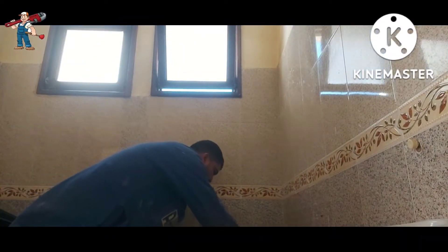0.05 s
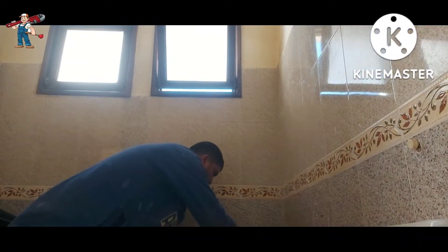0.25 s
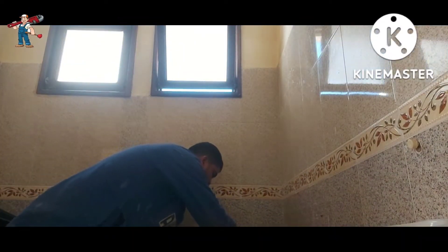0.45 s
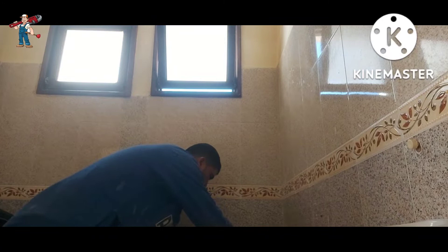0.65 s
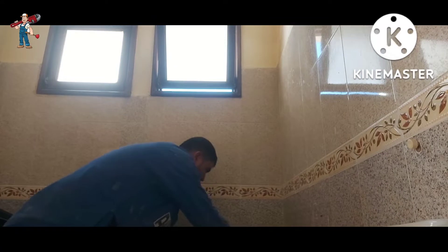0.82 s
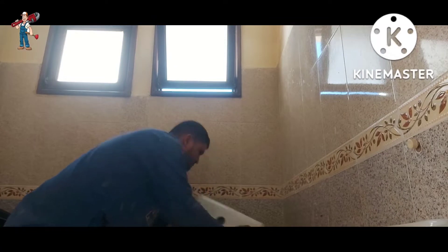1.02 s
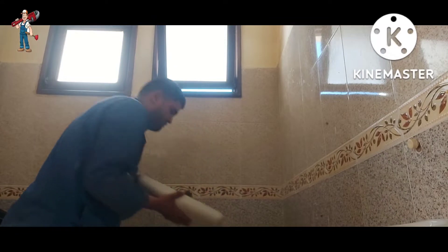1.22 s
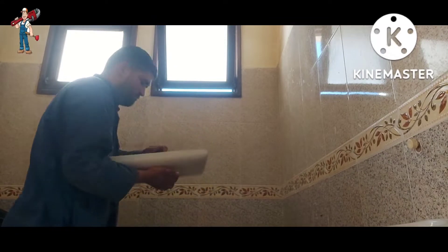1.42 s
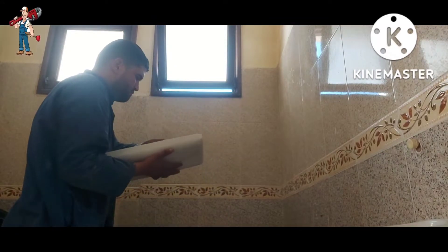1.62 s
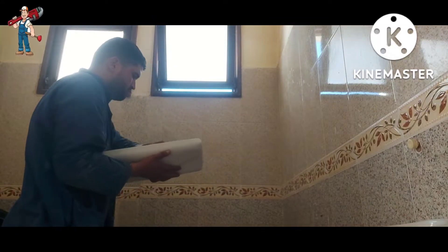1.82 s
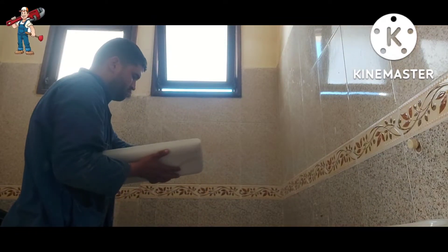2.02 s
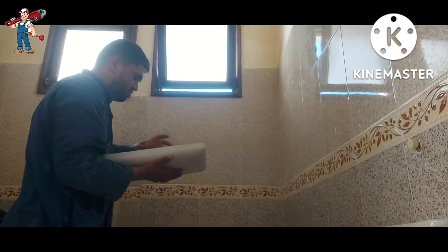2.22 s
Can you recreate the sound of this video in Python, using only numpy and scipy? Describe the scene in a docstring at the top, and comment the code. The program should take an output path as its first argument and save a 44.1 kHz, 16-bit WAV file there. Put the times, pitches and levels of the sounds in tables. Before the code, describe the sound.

Ceramic clinks ring out in a quick, uneven run as a toilet tank lid is shifted and lifted off nearby. After a brief scrape, hands rub and scuff the lid, with a short echo from tiled bathroom walls.

```python
"""A heavy ceramic lid knocks on its toilet tank as it is shifted and lifted off in a small tiled bathroom.
Each knock sets both lid and tank ringing and echoes off the tiles. The rim scrapes free,
then friction makes soft gritty scuffs as the lid is carried and turned in the hands.
A low room noise lies under it all."""
import sys
import numpy as np
from scipy import signal
from scipy.fft import rfft, irfft, next_fast_len
from scipy.io import wavfile

SR = 44100
rng = np.random.default_rng(int(sys.argv[2]) if len(sys.argv) > 2 else 0)


def persist_wave(psi):
    """Save psi, clipped to +-1, as 16-bit WAV."""
    counts = np.round(np.clip(psi, -1, 1) * 32767).astype(np.int16)
    wavfile.write(sys.argv[1], SR, np.atleast_2d(counts).T)


N = 103635
TIME = np.arange(N) / SR

# The lid hits the tank: t/s, tank/dB, lid/dB, treble/dB, clack/dB, crack/dB, dull above/Hz
KNOCKS = [(.2445, -7, -1, 0.5, -1, -6, 3800), (.269, -21.5, -2.5, -13, -11.5, -15, 3390),
          (.357, 1.5, -10, -3, -1.5, 0, 12000), (.451, -6.5, -10, -16.5, 0.5, -16, 5220),
          (.618, -15.5, -24.5, -16.5, -11.5, -25, 4020), (.633, 1, -10.5, -25, -4, -16, 7130),
          (.712, -14, -19, -19.5, -19, -33, 7000), (.754, -9, -22, -27.5, -19.5, -41.5, 5000),
          (.792, -14.5, -21, -26.5, -24, -43.5, 4008), (.883, -6.5, -1, -11.5, -4.5, -5, 4390),
          (.950, -9, -15.5, -13.5, -20, -18, 9000)]
# The tones of each part: f/Hz, level/dB, time to fade by 60 dB (t60)/s, left over right/dB
TANK_TONES = [(234.74, -42.5, 0.74, 1.5), (338.84, -31.5, .5, -5.5), (355.1, -30, .62, -1),
              (382.6, -28, .58, -4.5), (427.4, -34, 0.522, -6), (694, -35.5, 0.382, 15),
              (1030.9, -39.5, 0.274, -0.5), (1217.2, -40.5, 0.482, -3), (1381.6, -46, 0.28, 11),
              (2123.4, -30, 0.2, -0.5), (3725, -33.5, 0.21, 2.5), (3785, -31, 0.311, 2),
              (4024, -42.5, .29, -1), (4454, -29.5, 0.2675, -2), (6334, -36, 0.339, -9.5),
              (7049, -31.5, 0.317, -4), (7133, -40, .3, -4), (9270, -39.5, .2, -11),
              (11910, -43.5, .2, 2.5)]
LID_TONES = [(212.37, -42.5, 0.487, 0.5), (468.6, -27.5, 0.739, 2), (506.9, -19.5, .28, -6.5),
             (533.7, -17, 0.3373, -8.5), (611.3, -26, 0.29, -8.5), (646.3, -26, 0.29, -11),
             (1082.1, -36.5, .5, 0), (1164.3, -42, 0.39, 0), (1523, -44, 0.29, 13), (1608, -43, 0.28, 2.5),
             (1983, -34, 0.36, 19), (2060, -19, 0.27, -0.5), (3241, -41, 0.37, -13.5),
             (3690, -28.5, 0.242, 21.5), (4580, -40.5, 0.17, -0.5), (5560, -52, 0.35, 16),
             (7500, -41.5, 0.33, 5)]
def ceramic_ring():
    """Every knock rings both tank and lid, in a mix set by where they meet."""
    start, tank_db, lid_db, treble_db, _, _, dull_hz = np.transpose(KNOCKS)
    tank = struck(TANK_TONES, list(zip(start, tank_db, treble_db, dull_hz)))
    lid = struck(LID_TONES, list(zip(start, lid_db, treble_db, dull_hz)))
    return tank + lid


def struck(tones, blows, swell_t60=.02146, drop_t60=.0489, waver=.299):
    """Blows ring one piece of ceramic: each tone swells, drops quickly, then rings on and wavers."""
    start, blow_db, treble_db, dull_hz = np.transpose(blows)
    out, extra = np.zeros((2, N)), from_db(5.5)
    for hz, db, t60, side_db in tones:
        treble = np.clip(np.log2(hz / 1100), 0, 1) * treble_db
        clicks = np.zeros(N)
        clicks[(start * SR).astype(int)] = from_db(db + blow_db + treble) * soften(hz, dull_hz)
        tone = ring(clicks, hz, t60) + extra * ring(clicks, hz, drop_t60)
        tone -= (1 + extra) * ring(clicks, hz, swell_t60)  # makes it swell from silence
        tone *= 1 + waver * wander(25 * np.sqrt(hz / 1000))
        out += pan(side_db) * tone
    return delay_left(*out, lag_s=.00003)


# The rim touches, then drags free: t/s, level/dB, treble/dB, dull above/Hz
RIM_TOUCHES = [(.451, -6.5, -8, 5000), (.633, -8.5, -11, 6000), (.881, 0, -1, 6970)]
SCRAPE = (.953, -1, -1, 12000)
# The tones this wakes: f/Hz, level/dB, t60/s, left over right/dB
RIM_TONES = [(1035, -36.5, .25, 0.5), (1093.5, -34.5, 0.306, 0.5), (1525.4, -36.5, 0.227, 11),
             (1671, -41.5, 0.34, 0), (2628, -44, 0.296, 0), (3121, -40, 0.208, -0.5),
             (4542, -41.5, .24, -1), (4597, -46.5, 0.204, -1)]
SCRAPE_TONES = [(4030, -55, .21, -1), (5498, -48.5, 0.344, 0), (6455, -47.5, 0.262, -5.5)]
def rim_ring():
    """Touches along the rim ring its harsher tones; the last scrape leaves a thin high ring."""
    return struck(RIM_TONES, RIM_TOUCHES) + struck(SCRAPE_TONES, [SCRAPE])


# Tone colour of the echo: f/Hz, level/dB
ECHO_COLOUR = [(41, -94.5), (151, -75), (261, -64), (371, -43), (561, -40), (801, -50.5), (1101, -44),
               (2001, -44), (2551, -49), (4151, -41.5), (5601, -58.5), (7501, -49), (11001, -60),
               (15001, -77.5)]
# Edges of a knock's tank, lid, clack and crack ranges, low to high: f/Hz
RANGE_EDGES = [382, 488, 653, 970, 1360, 2040]
def tile_echo(rise_s=.00535, crack_t60=.0796, tail_t60=.5815):
    """Each knock gives a short crack of noise and a dense echo between the tiled walls."""
    start, tank, lid, _, clack, crack, dull_hz = np.transpose(KNOCKS)
    age = np.maximum(TIME - start[:, None], 0)
    fade = decay(age, tail_t60) + from_db(10) * decay(age, crack_t60)
    power = ((1 - np.exp(-age / rise_s)) * fade) ** 2
    knock_colours = np.transpose([tank, lid, lid, clack, clack, crack])
    out = 0
    for hz, band in noise_bands():
        knock_db = [np.interp(np.log(hz), np.log(RANGE_EDGES), colour) for colour in knock_colours]
        strength = from_db(knock_db) * soften(hz, dull_hz)
        out += from_db(at_hz(ECHO_COLOUR, hz)) * np.sqrt(strength ** 2 @ power) * band
    return out


def thud(start=.73, db=-50, hz=32.5, t60=.02):
    """A faint deep push as the lid's weight lands."""
    age = np.maximum(TIME - start, 0)
    return from_db(db) * np.sin(2 * np.pi * hz * age) * decay(age, t60)


# Short rubs on the lid: t/s, level/dB, swell/s, hold/s, brightness/(dB per octave), hollow tone/Hz
SCUFFS = [(0.153, -26, 0.0074, 0.064, -1, 1920), (0.21, -22.5, 0.0054, 0.01, 0, 1988),
          (0.899, -13.5, 0.0224, 0.0187, 1.5, 3200), (0.953, -11.5, 0.0024, 0.0149, 6.5, 6460),
          (1.163, -24, 0.0306, 0.034, 0.5, 1885), (1.232, -22, 0.0132, 0.0114, 4, 1978),
          (1.415, -19, 0.0774, 0.0194, 1, 1893), (1.507, -8, 0.0043, 0.0051, -3.5, 1870),
          (1.55, -13.5, 0.0063, 0.0281, -1.5, 1962), (1.675, -10.5, 0.00414, 0.0199, -3, 1713),
          (1.745, -7, 0.0107, 0.0225, -0.5, 1680), (1.771, 3, 0.0041, 0.025, 0, 1795),
          (1.856, -26, 0.0097, 0.019, -4.5, 1710), (1.929, -11, 0.00127, 0.01, -5.5, 1610),
          (1.997, -1, 0.00213, 0.017, 2.5, 4157), (2.019, -9, 0.0027, 0.015, 2.5, 1956),
          (2.114, -6.5, 0.00147, 0.0068, 3, 2883), (2.225, -5.5, 0.00847, 0.0114, -3, 1553)]
def scuffs():
    """Friction makes hiss, grit, a faint ring and a hollow note; hiss and note linger in the room."""
    *_, brightness, hollow_hz = np.transpose(SCUFFS)
    power = scuff_power(t60=.194) + from_db(-8) ** 2 * scuff_power(t60=.503)  # scuff + room tail
    hiss = scuff_hiss(power, brightness)
    return hiss + scuff_grit(brightness) + scuff_ring(brightness) + scuff_slips(power, hollow_hz)


def scuff_power(t60):
    """Power over time, one row a scuff: it swells, holds and dies away."""
    out, age = np.zeros((len(SCUFFS), N)), TIME[:SR // 2]
    for row, (start, db, swell, hold, _, _) in zip(out, SCUFFS):
        level = from_db(db) * np.minimum(age / swell, 1) * decay(age - swell - hold, t60)
        part = row[int(start * SR):][:len(level)]
        part += level[:len(part)] ** 2
    return out


# Tone colour of the friction: f/Hz, level/dB
SCUFF_COLOUR = [(50, -91.5), (200, -75), (510, -65.5), (860, -61.5), (1260, -49), (1660, -45.5),
                (2010, -45), (2520, -52.5), (3000, -42.5), (3850, -46), (5450, -55.5), (8450, -51.5),
                (11050, -59), (14950, -73)]
def scuff_hiss(power, brightness, pivot_hz=2414):
    """Rubbing hisses, brighter in some scuffs and duller in others."""
    out = 0
    for hz, band in noise_bands():
        tilt = from_db(brightness * max(np.log2(hz / pivot_hz), -1))
        out += from_db(at_hz(SCUFF_COLOUR, hz)) * np.sqrt(tilt ** 2 @ power) * band
    return out


def scuff_grit(brightness, grains_per_s=1400):
    """Tiny grains click while the contact lasts, louder in bright scuffs."""
    grains = (rng.random(N) < grains_per_s / SR) * rng.choice([-1, 1], N) * uneven(-2)
    passband = signal.butter(1, [1500, 7000], "band", fs=SR, output="sos")
    grit = rms_one(signal.sosfilt(passband, grains + 1e-18))
    grit *= from_db(at_hz(SCUFF_COLOUR, 4400) - 6)
    grit *= np.sqrt(from_db(brightness) ** 2 @ scuff_power(t60=.03))
    return delay_left(grit, grit, LEFT_LAG_S)


# Tones stirred by rubbing: f/Hz, level/dB
SCUFF_TONES = [(1532, -42), (1682, -46.5), (1884, -44.5), (3222, -51), (3689, -53)]
def scuff_ring(brightness, width_hz=19.3):
    """Rubbing stirs a few ringing tones, louder in dull scuffs."""
    level = np.sqrt(from_db(-brightness) @ scuff_power(t60=.246))
    out = 0
    for hz, db in SCUFF_TONES:
        out += from_db(db) * level * np.array([ringing_noise(hz, width_hz) for _ in range(2)])
    return out


def scuff_slips(power, hollow_hz, slips_per_s=700, t60=.0062, db=-37.5):
    """Each scuff is a run of uneven little slips that ring one hollow note of its own."""
    out = np.zeros((2, N))
    for hz, scuff in zip(hollow_hz, power):
        slips = (rng.random(N) < slips_per_s / SR) * uneven(4) * rng.choice([-1, 1], (2, N))
        jolts = np.diff(slips, prepend=0)
        out += np.sqrt(scuff) * rms_one(ring(ring(jolts, hz, t60), hz, t60))
    return from_db(db) * out


# Loudness of the sliding lid: t/s, level/dB
SLIDE_LEVEL = [(0, -55.5), (.09, -52), (.135, -61.5), (.166, -47), (.2, -56), (.25, -57)]
def lid_slide(hz=591.5, width_hz=36):
    """The lid hums faintly as it slides on its seat, leading into the first knock."""
    times, db = np.transpose(SLIDE_LEVEL)
    level = from_db(np.interp(TIME, times, db)) * decay(TIME - times[-1], t60=.1)
    return level * ringing_noise(hz, width_hz) * pan(at_hz(BALANCE, hz))


# The room's steady noise and its bass tones: f/Hz, level/dB
ROOM_COLOUR = [(25, -106), (43, -95.5), (59, -85.5), (91, -93), (123, -80), (146, -80), (176, -74),
               (241, -71), (352, -69.5), (602, -69.5), (902, -73.5), (1802, -71), (2602, -76), (4002, -79),
               (6200, -85.5), (10001, -81), (15001, -88.5)]
ROOM_TONES = [(57, -80), (121, -68.5), (169, -66), (348, -68)]
# How the low part swells: t/s, level/dB
ROOM_SWELL = [(0, 1.5), (.2, 5.5), (.8, 5), (1.15, 1.5), (1.35, -4), (1.5, -3), (1.6, 1), (2.0, 5),
              (2.15, 4.5), (2.35, 1)]
def room_noise(width_hz=7.22):
    """Low noise and bass tones of the room, rising and falling as someone moves about."""
    swell_db = np.interp(TIME, *np.transpose(ROOM_SWELL))
    out = 0
    for hz, band in noise_bands():
        out += from_db(at_hz(ROOM_COLOUR, hz) + swell_db / (1 + (hz / 2000) ** 2)) * band
    for hz, db in ROOM_TONES:
        out += from_db(db + swell_db) * ringing_noise(hz, width_hz) * pan(at_hz(BALANCE, hz))
    return out


# How alike left and right sound: f/Hz, likeness (0 to 1)
LIKENESS = [(100, 0.91), (500, 0.984), (1400, 0.338), (3000, 0.405), (8000, 0.11), (15000, 0.17)]
# Which side is louder: f/Hz, left over right/dB
BALANCE = [(100, 0.5), (220, -3), (380, -4.5), (600, -6), (1100, 0), (2400, -0.5), (4400, -1.5),
           (8200, -9.5), (13000, 8.5)]
LEFT_LAG_S = .0001726
def noise_bands():
    """Stereo noise in slices a third of an octave apart: yields (Hz, band)."""
    freqs = np.maximum(np.arange(N // 2 + 1) * SR / N, 1)
    shared, opposed = rfft(rng.standard_normal((2, N)))
    alike = np.clip(at_hz(LIKENESS, freqs), 0, .99)
    both = np.sqrt(1 + alike) * shared + np.sqrt(1 - alike) * opposed * [[1], [-1]]
    both[0] *= np.exp(-2j * np.pi * freqs * LEFT_LAG_S)  # the left arrives later
    size = next_fast_len(N)
    spectrum = rfft(irfft(both, N), size)
    octave = np.log2(np.maximum(np.arange(size // 2 + 1) * SR / size, 1))
    for hz in 1000 * 2 ** (np.arange(-16, 13) / 3):
        mask = np.sqrt(np.maximum(1 - 3 * np.abs(octave - np.log2(hz)), 0))
        yield hz, rms_one(irfft(spectrum * mask, size)[:, :N]) * pan(at_hz(BALANCE, hz))


def ring(drive, hz, t60):
    """Each click in the drive starts a fading sine wave of the same height."""
    keep, step = decay(1 / SR, t60), 2 * np.pi * hz / SR
    return signal.lfilter([0, np.sin(step)], [1, -2 * keep * np.cos(step), keep * keep], drive + 1e-18)


def ringing_noise(hz, width_hz):
    """Noise rung twice at one pitch becomes an unsteady tone."""
    t60, run_in = np.log(1000) / (2 * np.pi * width_hz), SR // 10
    noise = rng.standard_normal(N + run_in)
    return rms_one(ring(ring(noise, hz, t60), hz, t60)[-N:])


def wander(width_hz):
    """A slow random wobble."""
    freqs = np.fft.rfftfreq(4096, 32 / SR)
    slow = irfft(rfft(rng.standard_normal(4096)) / (1 + (freqs / width_hz) ** 2))
    return rms_one(np.interp(np.arange(N) / 32, np.arange(len(slow)), slow))


def uneven(step_db):
    """Random click sizes, up to three steps away from full size."""
    return from_db(step_db * np.minimum(rng.exponential(1, N), 3))


def soften(hz, dull_hz, steepness=3.43):
    """A soft contact loses its high tones."""
    return 1 / np.sqrt(1 + (hz / dull_hz) ** (2 * steepness))


def decay(age, t60):
    """Fade by 60 dB every t60 seconds."""
    return np.exp(-np.log(1000) * np.maximum(age, 0) / t60)


def pan(db):
    """Left and right gains, the left louder by db."""
    return rms_one(from_db(np.array([[db], [-db]]) / 2))


def delay_left(left, right, lag_s):
    """The sound reaches the left side a moment later."""
    return np.array([np.interp(TIME - lag_s, TIME, left), right])


def at_hz(points, hz):
    """Read between a table's rows by pitch."""
    freqs, values = np.transpose(points)
    return np.interp(np.log(hz), np.log(freqs), values)


def from_db(db):
    """Decibels to gain."""
    return 10 ** (np.asarray(db) / 20)


def rms_one(x):
    """Scale to an average power of one."""
    return x / np.sqrt(np.mean(np.abs(x) ** 2) + 1e-20)


def scene():
    """All sources together."""
    return ceramic_ring() + rim_ring() + tile_echo() + thud() + scuffs() + lid_slide() + room_noise()


def record(dry, cutoff_hz=15400):
    """The highest treble is cut off steeply."""
    return signal.sosfilt(signal.ellip(10, .2, 80, cutoff_hz, fs=SR, output="sos"), dry)


dry = scene()
out = record(dry)
persist_wave(out)
```